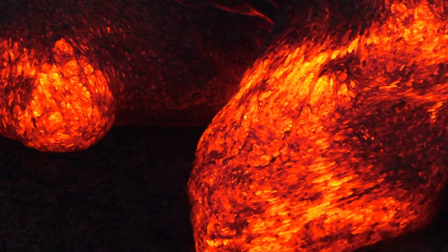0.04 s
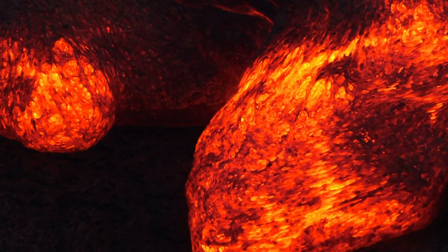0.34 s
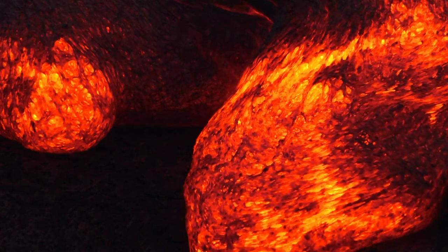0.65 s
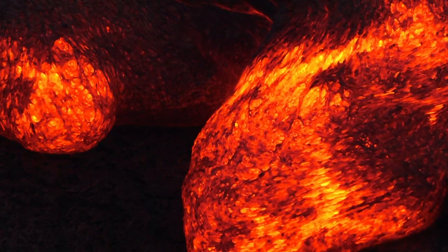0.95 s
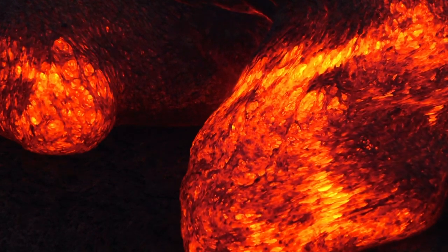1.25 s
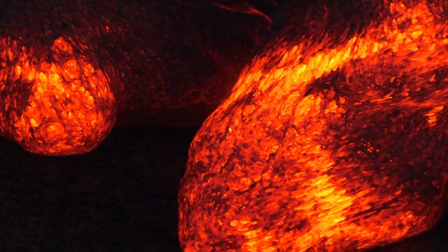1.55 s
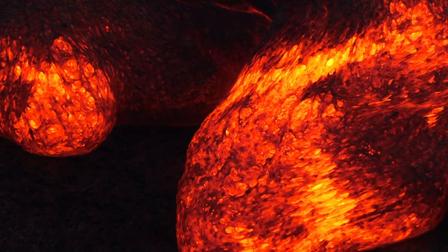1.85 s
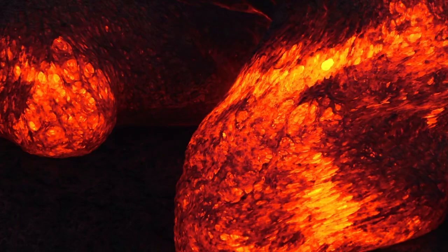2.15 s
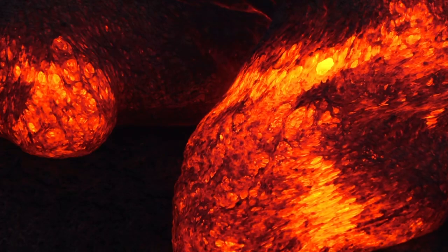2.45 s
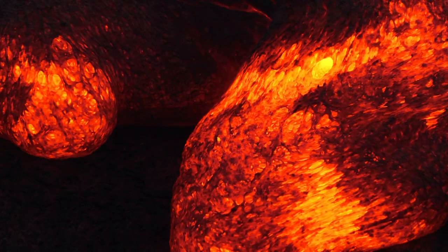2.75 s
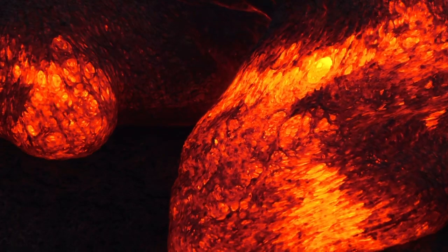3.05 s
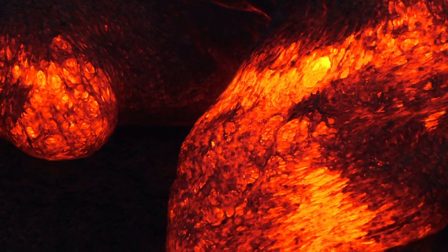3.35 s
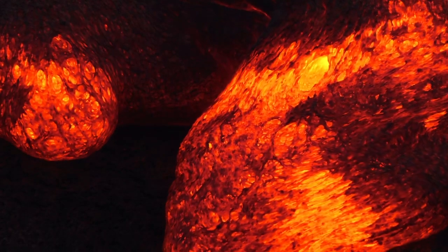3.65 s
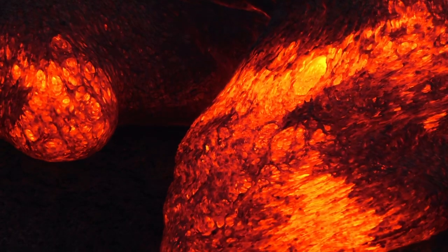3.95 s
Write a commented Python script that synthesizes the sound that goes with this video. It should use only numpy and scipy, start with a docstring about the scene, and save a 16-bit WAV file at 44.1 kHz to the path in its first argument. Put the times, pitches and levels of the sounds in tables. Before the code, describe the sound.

Wind rumbles on the microphone while creeping lava's crust faintly ticks and crackles.

```python
"""Lava creeps forward outdoors, its cooling, glassy crust ticking and cracking close by while wind
buffets the microphone with a deep rumble. Early on a breeze hisses over the rock and a few flakes ring.
Gusts push the diaphragm against its stop, so that it pops, and just after 1 s it briefly stalls.
Around 2.4 s the stretching skin fries hardest, and the loudest crack follows. Near the end the
ticking fades and a strong gust pins the diaphragm again: it pops and falls silent for moments."""
import sys
import numpy as np
from scipy import signal
from scipy.fft import rfft, irfft
from scipy.io import wavfile
from scipy.ndimage import uniform_filter1d

SR = 44100
rng = np.random.default_rng(int(sys.argv[2]) if len(sys.argv) > 2 else 0)


def wav_record(signal):
    """Record a signal, one row per channel, as 16-bit PCM in the file named by sys.argv[1]."""
    frames = np.transpose(np.atleast_2d(signal))
    bounded = np.clip(frames, -1, 1)
    # unit amplitude maps onto the largest positive 16-bit level
    quanta = np.round(bounded * 32767).astype(np.int16)
    wavfile.write(sys.argv[1], SR, quanta)


N = 4 * SR


def undb(db):
    return 10 ** (np.asarray(db) / 20)


def unit(x):
    """Scale to rms 1."""
    return x / np.sqrt(np.mean(x ** 2) + 1e-20)


def steady(x):
    """Ride the gain to iron out slow swells."""
    return x / np.sqrt(uniform_filter1d(x ** 2, size=6000) + 1e-20)


def curve(rows, column=1):
    """An automation lane: one table column, ramped over time."""
    rows = np.array(rows)
    return np.interp(np.arange(N) / SR, rows[:, 0], rows[:, column])


def swell(at, half_s):
    """A bell-shaped fade in and out."""
    return np.exp(-((np.arange(N) / SR - at) / half_s) ** 2)


def spells(rows):
    """The gain envelope of a series of swells."""
    return sum(undb(db) * swell(at, half_s) for at, half_s, db in rows)


def walk(rate):
    """Random modulation at rms 1, gliding to a new value every 1 / rate s."""
    hold = int(SR / rate)
    steps = np.repeat(rng.standard_normal(N // hold + 1), hold)
    return unit(uniform_filter1d(steps, hold)[:N])


def eq(x, points):
    """Apply an EQ curve of (f/Hz, gain/dB) points."""
    hz, db = np.array(points).T
    f = np.maximum(np.arange(N // 2 + 1) * SR / N, 1)
    return irfft(rfft(x) * undb(np.interp(np.log(f), np.log(hz), db)), N)


def band(x, hz, kind, order=2):
    """Butterworth filter."""
    return signal.sosfilt(signal.butter(order, hz, kind, fs=SR, output="sos"), x)


def add(out, at, x):
    """Mix a sound in at a cue time."""
    i = int(np.clip(at * SR, 0, N - 1))
    out[i:i + len(x)] += x[:N - i]


# EQ for the faint background hiss, with a notch cut near 9.5 kHz: f/Hz, gain/dB
HISS_EQ = [(300, 8.5), (1500, 5), (3000, -3.5), (5300, -5), (8000, -3), (9500, -19.5), (12000, -4.5),
           (16000, -21)]
def background_hiss(level_db=-67):
    """A faint, even bed of hiss."""
    return unit(eq(rng.standard_normal(N), HISS_EQ)) * undb(level_db)


# Breaths of breeze: t/s, half length/s, level/dB
BREEZE_SWELLS = [(.3, 0.19, -57), (.6, 0.071, -57.5)]
def breeze(band_hz=(600, 1800)):
    """The breeze brushes the rock with a midrange hiss."""
    return unit(band(rng.standard_normal(N), band_hz, "band", order=4)) * spells(BREEZE_SWELLS)


# Whirls of wind: t/s, f/Hz, glide/(Hz/s), peak level/dB
WHIRLS = [(.47, 148.9, -100, -12.5), (.67, 136.3, 22, -10.5), (1.88, 130.3, -200, -13.5),
          (2.03, 123.9, -42.5, -12), (2.57, 138.5, 260, -11), (2.8, 183.9, 205, -14),
          (3.827, 171.2, -2.5, -10)]
WHIRL_HALF_S = .055
def whirls():
    """Eddies shed in step for a moment: each whirl is a low, gliding hoot."""
    out, t = np.zeros(N), np.arange(N) / SR
    for at, hz, glide, db in WHIRLS:
        cycles = rng.random() + hz * (t - at) + glide * (t - at) ** 2 / 2
        out += undb(db) * swell(at, WHIRL_HALF_S) * np.sin(2 * np.pi * cycles)
    return out


# Centre of the growl: t/s, f/Hz
GROWL_PITCH = [(0.0, 125), (1.41, 122), (1.9, 134), (2.25, 117), (2.41, 131), (2.46, 114), (2.52, 129),
               (3.22, 120), (3.59, 126), (3.7, 112)]
def growl(width_hz=55.2):
    """Eddies growl as a narrow noise band around one wandering pitch."""
    a, b = band(rng.standard_normal((2, N)), width_hz / 2, "low")
    phase = 2 * np.pi * np.cumsum(curve(GROWL_PITCH)) / SR
    return steady(a * np.cos(phase) + b * np.sin(phase))


# EQ for the eddies: f/Hz, gain/dB
WIND_EQ = [(15, -6.5), (28, 6.5), (50, -3), (78, -6), (130, -6), (215, -17.5), (310, -22.5), (500, -35.5),
           (800, -51), (1300, -65), (2200, -81), (5000, -92.5)]
# Wind faders, ahead of the trims: t/s, buffeting level/dB, rumble level/dB, rush level/dB
WIND_FADERS = [(0.0, -14, -15, -30), (0.18, -12, -13.5, -29.5), (0.63, -11, -11.5, -27.5),
               (0.99, -12, -17.5, -41), (1.07, -10, -15, -27.5), (1.17, -14, -14.5, -30),
               (1.34, -11, -16, -35), (1.48, -17, -14.5, -36.5), (1.7, -15, -14.5, -27.5),
               (1.97, -20, -14, -36), (2.33, -6.5, -12, -26.5), (2.42, -31, -13, -34),
               (2.46, -4.5, -19, -27.5), (2.53, -17, -13, -31), (2.64, -12, -10, -28.5),
               (2.7, -11, -16.5, -33), (3.61, -14.5, -12.5, -32.5), (3.69, -4, -28, -45.5),
               (3.85, -25, -12.5, -25), (3.89, -15.5, -40, -69), (3.92, -10, -11.5, -33.5),
               (3.98, -11.5, -30.5, -34.5)]
def wind(low_hz=71.4, high_hz=222.6):
    """Eddies hit the microphone: deep buffeting, then a rumble and a rush above it that flutter as one."""
    def eddies(hz, kind):
        return steady(band(eq(rng.standard_normal(N), WIND_EQ), hz, kind, order=4))

    buffeting = eddies(low_hz, "low") * undb(curve(WIND_FADERS, 1) + 1)
    rumble = eddies([low_hz, high_hz], "band") * undb(-2.5)
    rush = eddies(high_hz, "high") * undb(curve(WIND_FADERS, 3) + 3.5)
    rumble += growl() * undb(-8.5)
    flutter = walk(rate=60)
    duck_db = -2 * sum(swell(at, WHIRL_HALF_S) for at, *_ in WHIRLS)  # whirls draw on the rumble
    rumble *= undb(curve(WIND_FADERS, 2) + 1.5 * flutter + duck_db)
    rush *= undb(3 * flutter)
    return buffeting + rumble + rush + whirls()


# Gusts leaning on the diaphragm: t/s, half length/s, share of its travel used up
GUSTS = [(0.301, .12, 0.73), (1.076, 0.05, 0.64), (1.719, 0.074, 0.82), (2.234, .11, 0.6),
         (2.652, 0.03, 0.72), (3.372, 0.033, 0.54), (3.56, 0.075, 0.68), (3.826, .05, 0.8)]
# Dropouts while it stays at its stop: t/s, length/s, share of the motion let through
STALLS = [(1.043, 0.014, .3), (1.095, 0.016, 0.22), (3.793, 0.026, 0.04), (3.848, 0.075, 0.053)]
def diaphragm(pressure, travel=1.356, recover_hz=23.4):
    """At its stop the diaphragm hardly follows the air: the sound sags and only sub-bass seeps through."""
    t = np.arange(N) / SR
    lean = sum(share * swell(at, half_s) for at, half_s, share in GUSTS)
    gate = np.where(pressure < travel * (1 - lean), 1., 0.)
    for at, length, share in STALLS:
        gate[(t > at) & (t < at + length)] = share
    gate = uniform_filter1d(gate, size=8)
    seep = undb(-1) * band(pressure, hz=35, kind="low")
    motion = np.gradient(pressure) * gate + np.gradient(seep) * (1 - gate)
    leak = np.exp(-2 * np.pi * recover_hz / SR)  # a held signal sinks back to zero
    return signal.lfilter([1], [1, -leak], motion)


# The diaphragm hits or leaves its stop: t/s, relative click level/dB, thud weight/dB
POPS = [(0.1857, -34.5, -28), (0.1906, -34, -19.5), (0.2721, -31, -17), (0.3124, -35, -19),
        (0.3324, -46, -25), (0.367, -34.5, -14), (1.044, -32.5, -30), (1.0509, -37, -31),
        (1.0751, -43, -23), (1.0861, -29.5, -33), (1.111, -37.5, -30.5), (1.416, -46, -28),
        (1.6895, -31, -21), (1.7069, -32.5, -23), (1.72, -35.5, -17), (1.7251, -40, -7),
        (1.7632, -31.5, -26), (2.141, -33, -34), (2.1511, -35.5, -21), (2.1893, -34.5, -11),
        (2.213, -33.5, -26), (2.2771, -29.5, -22.5), (2.6411, -34.5, -33), (2.797, -34.5, -15),
        (3.3821, -35, -28), (3.3916, -32.5, -20), (3.4373, -40, -23), (3.517, -28, -29),
        (3.5267, -35.5, -30), (3.5866, -33, -27), (3.5944, -36, -19), (3.6218, -40, -27.5),
        (3.772, -35, -23.5), (3.7809, -35.5, -10), (3.8139, -28, -14.5), (3.8206, -36.5, -17.5),
        (3.8442, -32, -19), (3.914, -37, -30), (3.9355, -29, -53)]
def pops(kink_s=.0013, typical_thud_db=-26, lag_s=.0015, rebound_s=.003):
    """Each knock is a sharp kink in the pressure that relaxes at once, chased by a weaker rebound."""
    out, t = np.zeros(N), np.arange(SR // 40) / SR
    for at, click_db, thud_db in POPS:
        polarity, jitter = rng.standard_normal(2)
        decay_s = kink_s * undb(.56 * (thud_db - typical_thud_db))  # heavier knocks last longer
        kink = np.sign(polarity) * undb(click_db + 22.5) * t / kink_s * np.exp(1 - t / decay_s)
        add(out, at + lag_s, kink)
        add(out, at + lag_s + rebound_s * np.exp(.3 * jitter), -undb(-9.5) * kink)
    return band(out, hz=4570, kind="low")


def snap(t, tail_db, attack_s=.00026, decay_s=.00081, tail_s=.007):
    """Envelope of a fracture: a tight transient and a faint tail scattered by the rock around."""
    attack = 1 - np.exp(-(t / attack_s) ** 2)
    return attack * (np.exp(-t / decay_s) + undb(tail_db) * np.exp(-t / tail_s))


def grains(per_s, spread_db, eq_points, pool=4000):
    """A granular texture at rms 1: tiny dry fractures of uneven size, taken from a pool."""
    out, t = np.zeros(N), np.arange(SR // 50) / SR
    cues = rng.random((pool, 2))[:int(per_s * N / SR)]
    bursts = rng.standard_normal((pool, len(t))) * snap(t, tail_db=-16)
    for (position, size), burst in zip(cues, bursts):
        db = spread_db * min(-np.log(1 - size), 3.5)  # many small grains, few big ones
        add(out, position * N / SR, undb(db) * burst)
    return unit(eq(out, eq_points))


# EQ for the ticks, bright with a deep notch cut near 9.3 kHz: f/Hz, gain/dB
TICK_EQ = [(600, -32), (1600, -14.5), (2400, 3.5), (3500, 9), (4400, 4), (5200, 10), (6300, 6.5),
           (7400, -3.5), (8100, 7.5), (9300, -33.5), (11000, 1), (13500, -2.5), (16000, -8)]
# Ticking fader: t/s, level/dB
TICK_FADER = [(0, -68), (.25, -59.5), (.55, -64.5), (.8, -71), (1.4, -68.5), (1.85, -62.5), (2.1, -64.5),
              (2.4, -57.5), (2.7, -63), (3.0, -62.5), (3.4, -65), (3.75, -69.5), (4, -80)]
def ticking():
    """Faint ticks all over the cooling crust."""
    return grains(per_s=150, spread_db=7.5, eq_points=TICK_EQ) * undb(curve(TICK_FADER))


# EQ for the frying, a high sizzle with a deep notch cut near 9.3 kHz: f/Hz, gain/dB
FRY_EQ = [(1500, -17.5), (3500, -10), (5200, -2), (6400, -2), (7500, -1.5), (8100, 5.5), (9300, -27),
          (10600, 2.5), (13000, -1), (16000, -2.5)]
# Spells of frying: t/s, half length/s, level/dB
FRY_SWELLS = [(.46, 0.057, -63), (.585, 0.047, -58), (.755, 0.017, -55.5), (1.18, 0.03, -61),
              (1.68, 0.078, -66), (2.08, 0.064, -61), (2.36, 0.057, -51), (2.565, 0.08, -57.5),
              (2.625, 0.013, -59), (2.94, .025, -59), (3.11, 0.018, -49)]
def frying():
    """The skin fries brightly as it stretches, over a soft sizzle that follows the ticking."""
    sizzle = undb(curve(TICK_FADER) - 14)
    return grains(per_s=260, spread_db=5, eq_points=FRY_EQ) * (spells(FRY_SWELLS) + sizzle)


# EQ for the rasp: f/Hz, gain/dB
RASP_EQ = [(700, -11.5), (1600, 2.5), (3500, -2), (5300, -7.5), (7500, -11.5), (10000, -21.5)]
# Short drags: t/s, half length/s, level/dB
RASP_SWELLS = [(.885, 0.024, -59.5), (1.475, 0.019, -60), (1.9, 0.016, -55.5), (2.33, 0.046, -58),
               (2.9, 0.036, -57.5)]
def rasping():
    """The crust drags with a dense, even-grained rasp."""
    return grains(per_s=600, spread_db=2.5, eq_points=RASP_EQ) * spells(RASP_SWELLS)


# EQ for the crunch: f/Hz, gain/dB
CRUNCH_EQ = [(550, 5.5), (1200, -12), (2500, -19), (9000, -40.5)]
# Crunches: t/s, half length/s, level/dB
CRUNCH_SWELLS = [(.269, .004, -39), (1.068, 0.011, -39), (1.705, .028, -48), (2.287, 0.0097, -35.5),
                 (2.516, 0.0026, -37), (3.36, 0.035, -44.5), (3.595, 0.022, -44)]
def crunching():
    """Tightly packed fractures make dark, gritty crunches."""
    return grains(per_s=800, spread_db=5, eq_points=CRUNCH_EQ) * spells(CRUNCH_SWELLS)


# Ringing flakes: t/s, f/Hz, peak level/dB
TINKS = [(.414, 5130, -41.5), (.444, 8070, -34), (0.572, 6700, -43.5), (.584, 5150, -44),
         (.619, 5040, -49.5), (2.372, 8170, -35.5), (2.968, 4000, -42.5), (3.016, 3050, -43),
         (3.266, 3380, -39)]
def tinks(decay_s=.0025):
    """Glassy flakes give a tiny ping as they break."""
    out, t = np.zeros(N), np.arange(SR // 30) / SR
    for at, hz, db in TINKS:
        add(out, at, undb(db) * np.sin(2 * np.pi * hz * t) * np.exp(-t / decay_s))
    return out


# Low, mid and high filter bands for the cracks: bottom f/Hz, top f/Hz, trim/dB
CRACK_BANDS = [(1400, 5400, -15), (4750, 8030, -18.5), (10440, 13500, -9)]
# Crack cues, ahead of the trims: t/s, hardness/dB, low level/dB, mid level/dB, high level/dB
CRACKS = [(0.175, -29, -49.5, -48, -68), (0.231, -22, -44, -53, -65), (0.259, -32, -31.5, -39, -62),
          (0.4128, -32, -47, -42.5, -50.5), (0.4415, -35, -40, -33, -48), (0.452, -32, -56, -45, -57),
          (0.479, -43, -70, -46, -60), (0.493, -42, -69, -44, -65), (0.571, -40.5, -50, -49, -62),
          (0.5824, -32.5, -53.5, -48, -65), (0.6173, -32, -54, -57, -69), (0.7504, -39.5, -51, -47, -63),
          (0.864, -36, -47, -54, -64), (0.9057, -32, -57, -50, -69), (1.0204, -42, -44, -50, -64),
          (1.304, -31, -45, -47, -53), (1.4555, -47, -44, -55, -70), (1.732, -33, -44, -36, -44.5),
          (1.895, -38.5, -47, -55, -63), (1.941, -29, -48.5, -44.5, -50), (2.1172, -34, -38, -50, -57.5),
          (2.2723, -30, -45, -41.5, -73), (2.285, -31, -53, -45, -65), (2.3194, -44, -57, -55, -54),
          (2.3273, -41, -50, -59, -61), (2.3678, -31, -48, -37.5, -50), (2.411, -38, -45, -40, -63),
          (2.5136, -18, -30, -24, -43), (2.5402, -32, -44.5, -45, -54), (2.554, -38, -60, -52, -58),
          (2.739, -31, -44.5, -44.5, -59.5), (2.8716, -35, -44, -41.5, -68), (2.967, -39, -46, -51, -67),
          (3.013, -46, -44, -48, -64), (3.0974, -32, -59, -47, -69), (3.112, -33, -49.5, -40, -46.5),
          (3.2038, -35, -66, -50, -71), (3.232, -38, -58, -50.5, -72), (3.2623, -42, -52, -44, -66),
          (3.455, -41, -41, -71, -68), (3.47, -28, -38, -58, -61.5)]
def cracks(typical_hardness_db=-33, lag_s=.001):
    """Flakes of crust snap off close by in dry, three-band bursts."""
    out, t = np.zeros(N), np.arange(SR // 30) / SR
    for at, hardness_db, *levels in CRACKS:
        tail_db = -19.5 - .8 * (hardness_db - typical_hardness_db)  # harder cracks are drier
        envelope = snap(t, tail_db)
        for db, (lo, hi, trim_db) in zip(levels, CRACK_BANDS):
            burst = band(rng.standard_normal(len(t)) * envelope, [lo, hi], "band", order=3)
            add(out, at + lag_s, unit(burst) * undb(db + trim_db))
    return out


def scene():
    """Hiss, wind and crust textures pass through the diaphragm; pops, tinks and cracks sit on top."""
    pressure = background_hiss() + breeze() + wind()
    pressure += ticking() + frying() + rasping() + crunching()
    return (diaphragm(pressure) + pops() + tinks() + cracks())[None]


def record(dry, fade_s=.003, top_hz=15800):
    """Clip at full scale, fade out the very end and cut the top steeply."""
    fade = np.minimum(np.arange(N)[::-1] / SR / fade_s, 1)
    high_cut = signal.ellip(8, .2, 70, top_hz, fs=SR, output="sos")
    return signal.sosfilt(high_cut, np.clip(dry, -1, 1) * fade)


dry = scene()
out = record(dry)
wav_record(out)
```